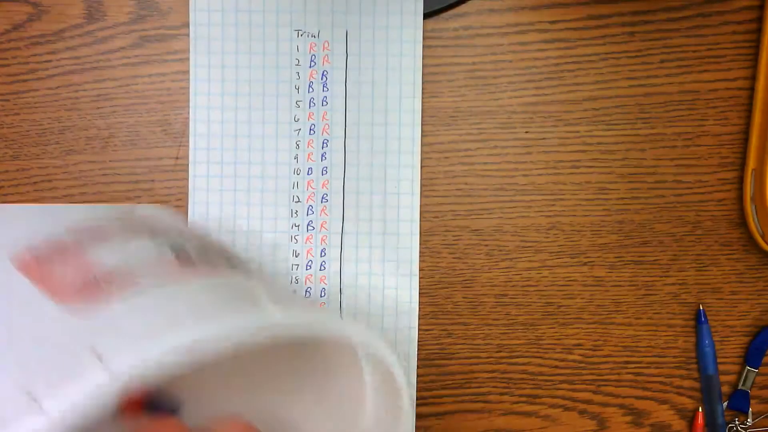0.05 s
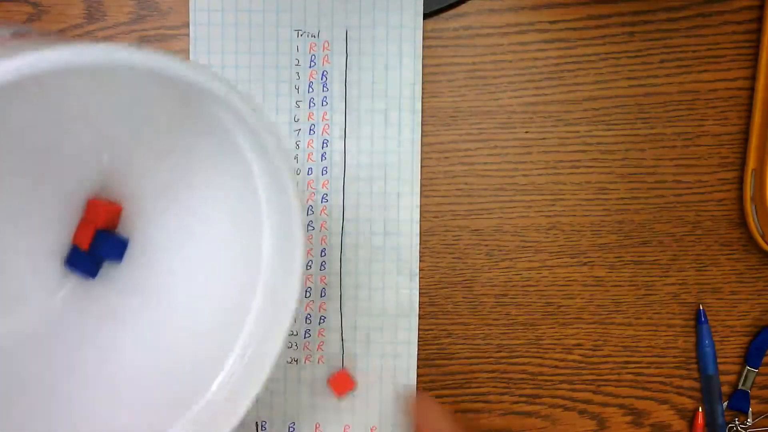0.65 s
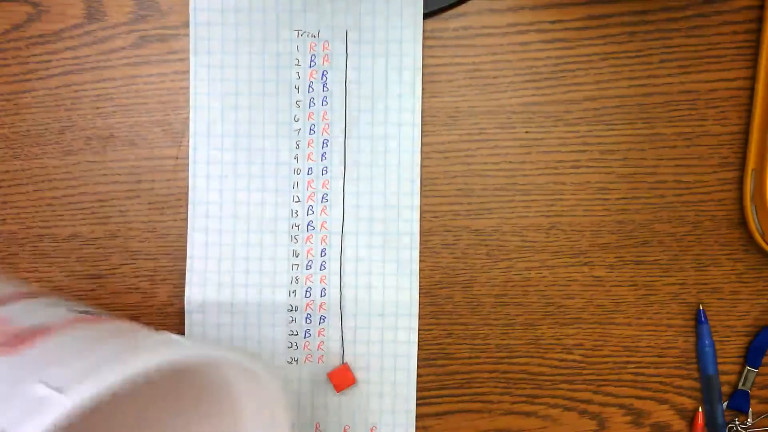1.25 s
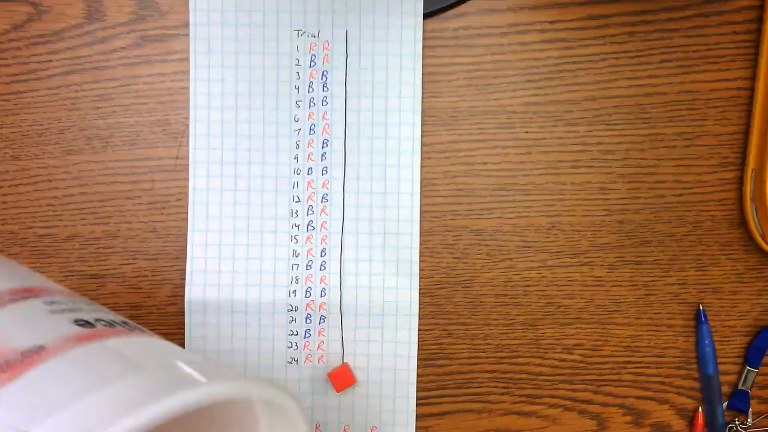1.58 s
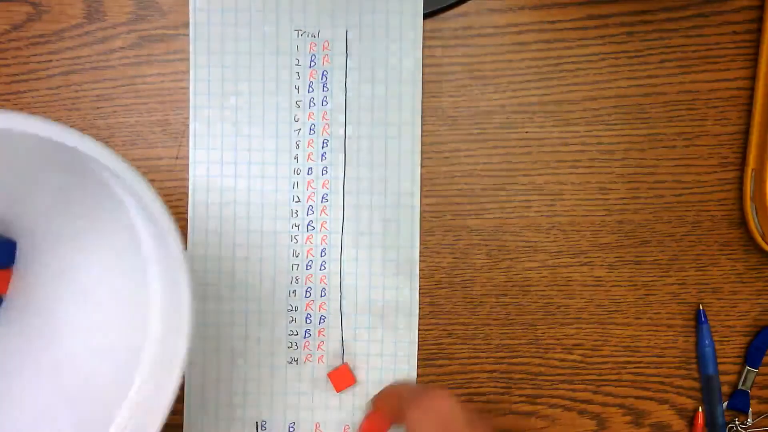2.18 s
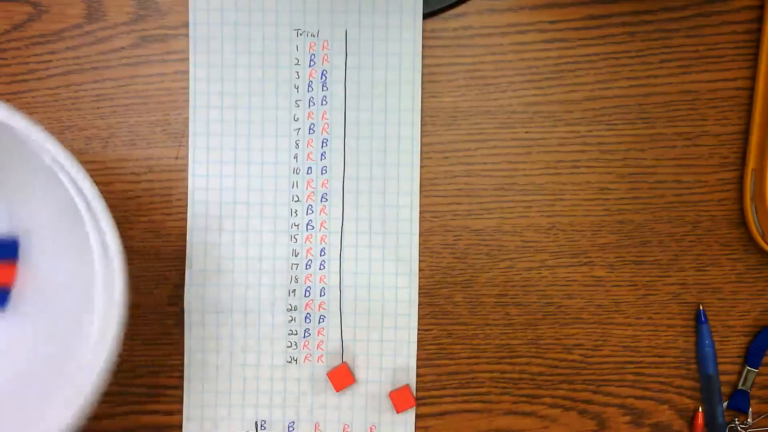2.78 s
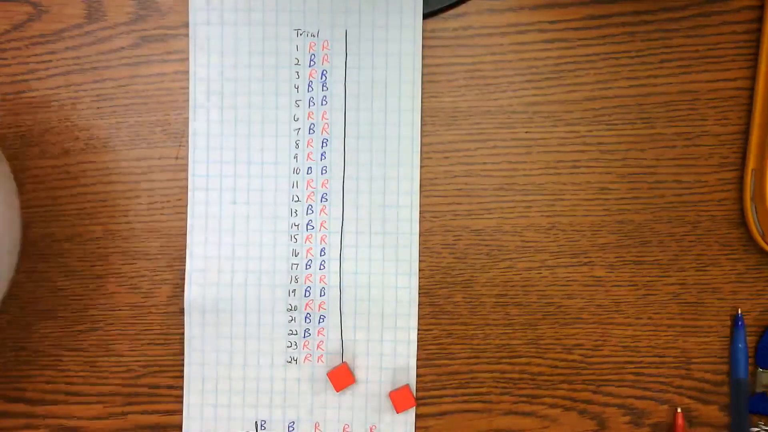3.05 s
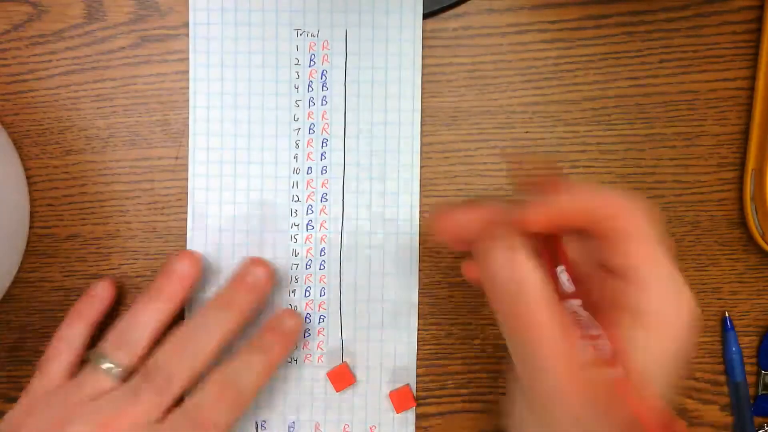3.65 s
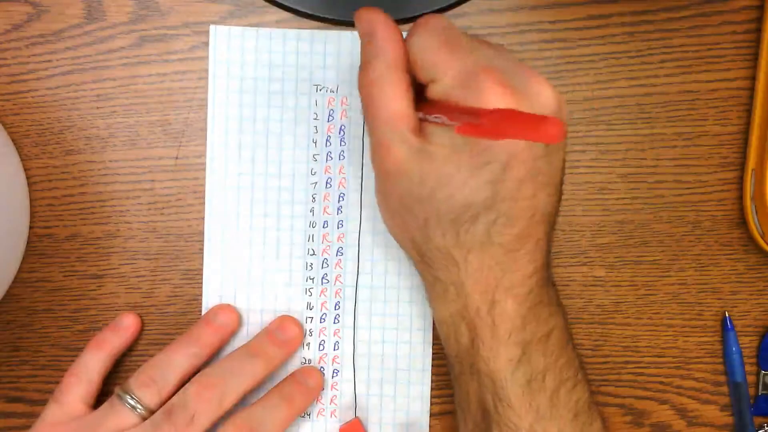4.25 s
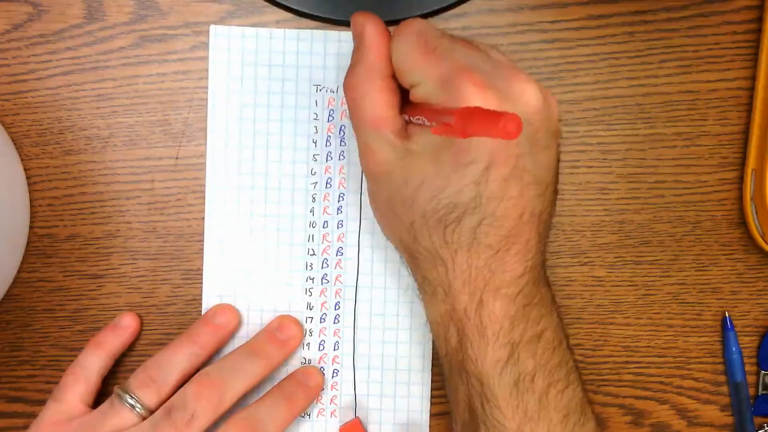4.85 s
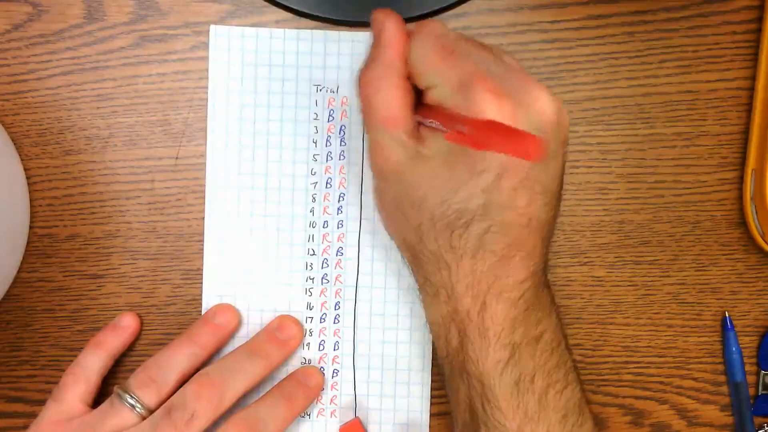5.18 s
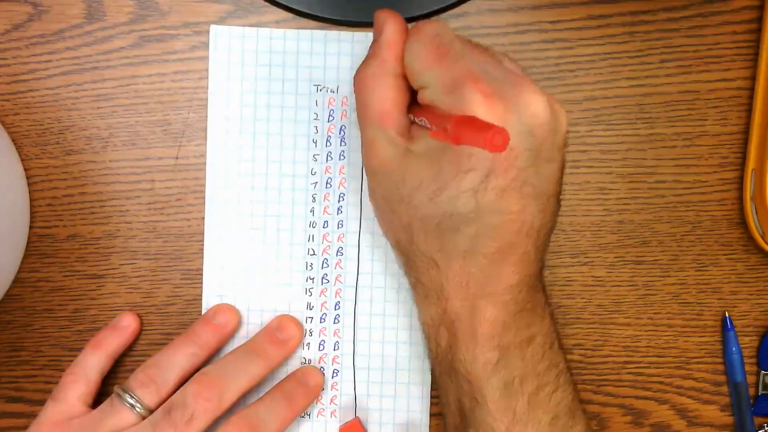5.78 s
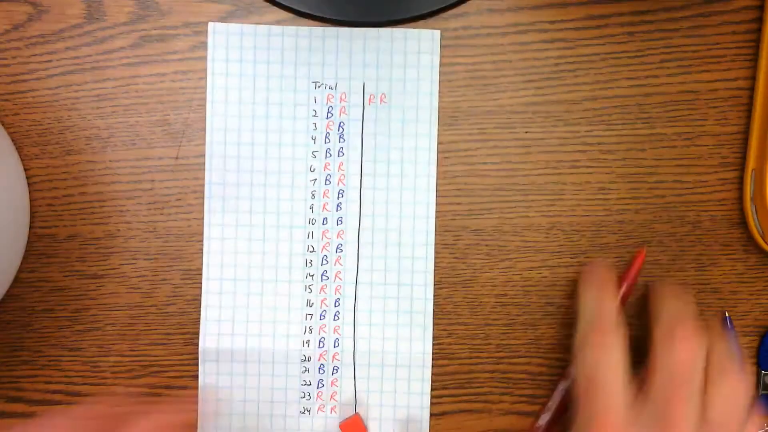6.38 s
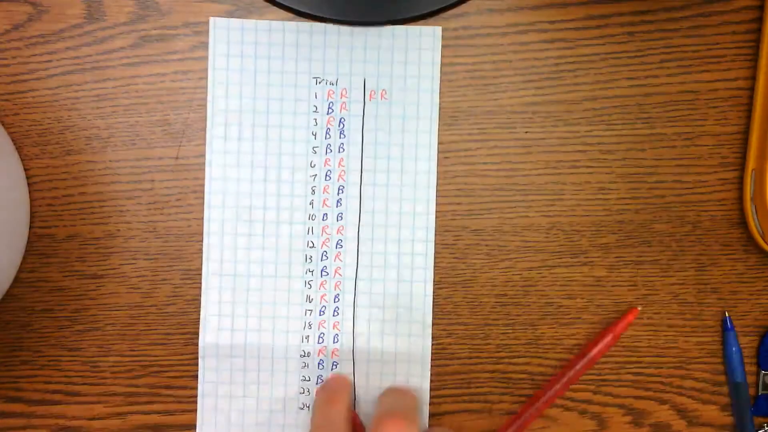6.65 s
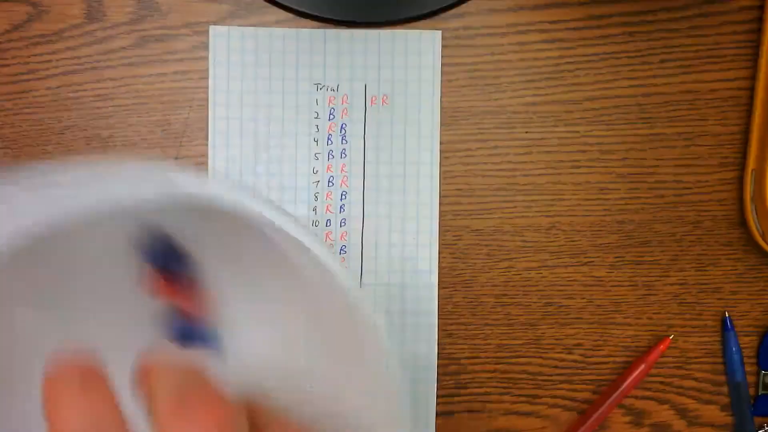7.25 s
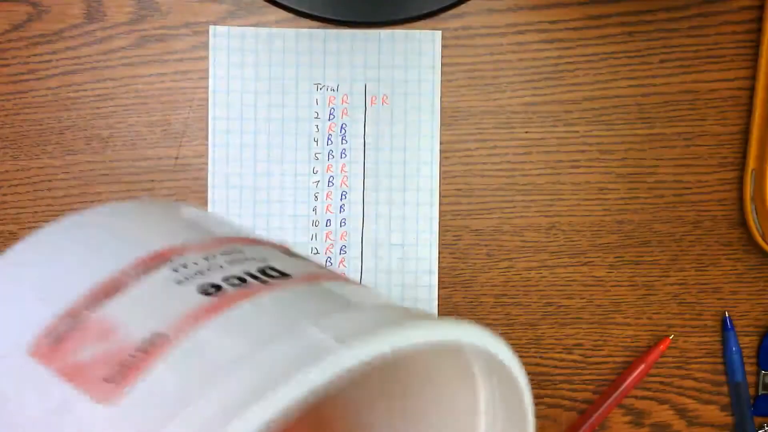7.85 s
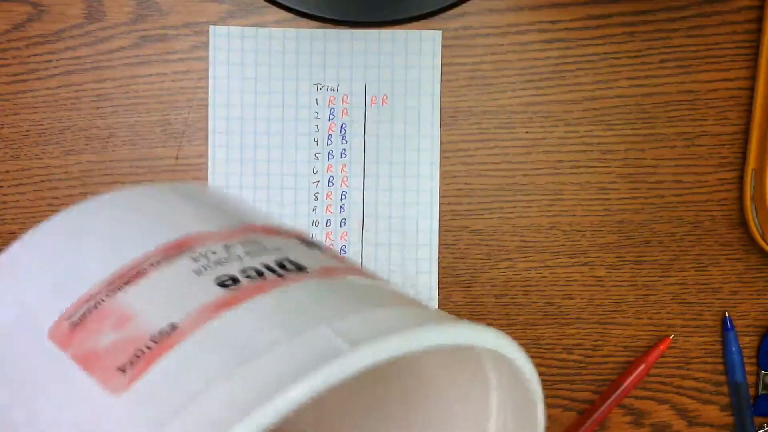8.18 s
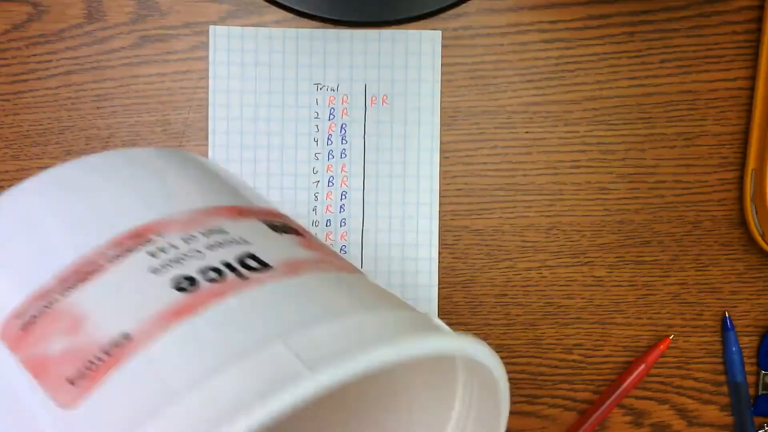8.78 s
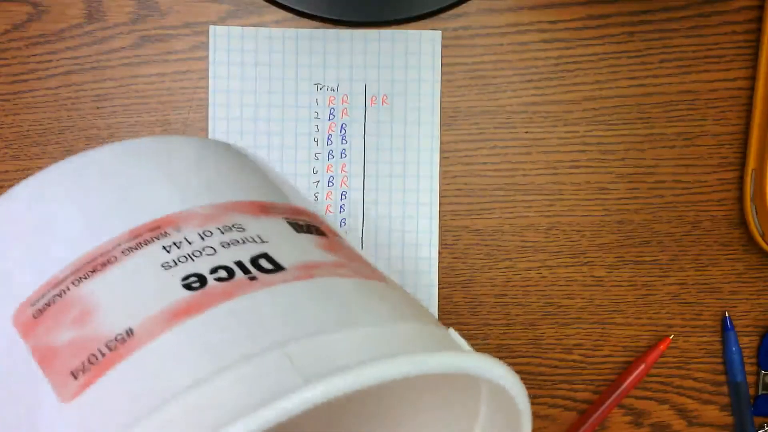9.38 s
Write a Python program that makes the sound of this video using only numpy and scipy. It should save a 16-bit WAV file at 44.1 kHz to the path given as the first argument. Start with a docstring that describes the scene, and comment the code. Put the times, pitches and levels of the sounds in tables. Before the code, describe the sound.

Small plastic cubes rattle, clack and skid inside a thin plastic tub, shaken in uneven bursts for the first two seconds. A cube clicks onto a desk at about 0.5 seconds and another, more lightly, at 2.4. Around 2.9 to 3.3 seconds the tub is set down with hollow knocks as the cubes shift inside. Hands and paper brush softly over the desk until about 4 seconds, with a couple of light taps. It is then nearly silent until more soft brushing at 6 seconds and the sharp click of a pen put down at 6.4. Faint scrapes follow. At 7.3 seconds cubes drop into the tub with the loudest clack, starting busy, continuous rattling that lasts until about 9.5 seconds. Everything is close to the microphone, in a small room with a faint, steady ventilation hum.

```python
"""A quiet, humming room; a small desk microphone stands close to a thin plastic tub of small plastic cubes.
First the cubes are shaken and stirred: each knock rings the tub's base and wall and clacks the cube,
and between knocks they jostle and slide. Then the tub is set down, cubes and a pen are put on the desk,
and hands and paper brush over it. Two cubes drop back into the tub; the hardest hit, at 7.3 s,
opens a last two seconds of rattling."""
import sys
import numpy as np
from scipy import signal
from scipy.fft import rfft, irfft
from scipy.io import wavfile

SR = 44100
rng = np.random.default_rng(int(sys.argv[2]) if len(sys.argv) > 2 else 0)


def generate_wav(sig):
    """Save sig (samples, or channels by samples) to the path in sys.argv[1] as 16-bit PCM at SR."""
    pcm = np.round(np.clip(np.atleast_2d(sig).T, -1, 1) * 32767).astype(np.int16)
    wavfile.write(sys.argv[1], SR, pcm)


N = 419832
TIME = np.arange(N) / SR

# spectrum of the room tone: (frequency [Hz], relative density [dB])
ROOM_TONE = [(15, -46), (25, -2), (86, -12.5), (124, -11.5), (380, -10), (438, -20), (518, -15.5),
             (627, -8.5), (759, -11), (1090, -6.5), (1380, -21), (1480, -11.5), (2220, -17), (5120, -18.5),
             (7500, -33), (9750, -82), (16500, -120)]
# mains hum and fan tones: (frequency [Hz], level [dB])
HUM_TONES = [(120, -77.5), (323, -79.5), (438, -75), (640, -75.5), (1287, -76.5), (1443, -79.5)]
# hands and paper sliding over the desk: (time [s], level [dB])
PAPER_LEVELS = [(3.35, -82), (3.48, -61), (3.6, -70), (3.74, -63), (3.92, -60.5), (4.15, -74), (5.9, -82.5),
                (6.12, -62), (6.26, -62.5), (6.36, -68), (6.62, -61), (6.8, -63), (7.1, -70)]
# cubes and pen touching the desk: (time [s], level [dB], brightest pitch [Hz], its width [octaves])
DESK_TAPS = [(0.5115, -34.5, 4460, 1.2), (2.3697, -47, 5270, 0.8), (2.3747, -42.5, 4640, 2),
             (3.707, -51, 4437, 0.67), (3.785, -42.5, 1950, 8.4), (5.451, -53, 1300, 1.3),
             (6.388, -30, 3220, 5.1), (6.3947, -23, 4500, 2.4), (6.398, -31, 1550, 0.81),
             (6.4492, -38, 1950, 4.2)]
# modes of the whole tub, its base, its wall, and a cube against it: (frequency [Hz], level [dB], t60 [s])
TUB_MODES = [(238, -1.5, 0.1), (295, -12, 0.049), (405, -6.5, 0.067), (586, 11.5, 0.056), (668, 3.5, 0.13),
             (815, 6, 0.013), (893.9, 8, 0.09), (1330, -7, 0.11), (1550, -2.5, 0.038)]
BASE_MODES = [(555.5, -10.5, 0.11), (599, -11.5, 0.037), (652, -2, 0.081), (711, -4, 0.14),
              (964, -3, 0.079)]
WALL_MODES = [(1241, -6, 0.045), (1444, -7.5, 0.053), (1551, 0, 0.028), (1699, -3.5, 0.03),
              (2150, 7.5, 0.022), (2288, 1.5, .04), (2373, -4.5, 0.028), (2510, -4, 0.06)]
CUBE_MODES = [(2940, -2.5, 0.017), (3220, 1.5, 0.017), (3535, -1, 0.013), (3900, -6.5, .016),
              (4447, -9, 0.03), (5376, -6.5, 0.013), (5770, -11, 0.045), (7340, -23.5, 0.0067)]
# blows that move the whole tub: (time [s], level [dB], driven pitch [Hz])
TUB_THUMPS = [(.961, -51.5, 239), (2.9025, -24, 640), (2.902, -36.5, 392), (2.903, -38.5, 257),
              (3.197, -35.5, 635), (3.198, -46.5, 333.6), (3.268, -41.5, 662), (6.816, -52, 660),
              (7.3325, -25.5, 900), (7.3335, -16.5, 1560), (7.335, -40.5, 257), (7.334, -37.5, 415)]
# a cube skidding, or a hand scraping, along the tub: (start [s], end [s], level [dB], driven pitch [Hz],
# scratch gain [dB])
TUB_SCRAPES = [(0.103, 0.133, -34.5, 1550, -22.5), (0.199, 0.441, -45.5, 2220, -21),
               (1.677, 1.807, -49, 3200, -15), (1.81, 2.063, -39.5, 2250, -18),
               (2.103, 2.164, -50.5, 2300, -22), (3.015, 3.203, -47.5, 1960, -19),
               (6.697, 6.86, -59.5, 2900, -6), (6.841, 6.905, -46.5, 2200, -11),
               (6.893, 6.923, -42.5, 1900, -11), (7.026, 7.055, -59, 1900, -14),
               (7.197, 7.272, -52.5, 1800, -8.5), (8.949, 9.036, -43, 2128, -11),
               (9.322, 9.412, -47.5, 2100, -20)]
# wall resonances that a skid excites: (frequency [Hz], width [Hz], gain [dB])
SKID_RESONANCES = [(1580, 64, 7.5), (2263, 65, -1.5), (3370, 83, 1.5), (4040, 230, -10.5), (4930, 370, -3)]
# each shake, stir or drop sets the cubes tumbling: (start [s], length [s], level [dB])
CUBE_TUMBLES = [(0.0, 0.22, -38.5), (0.935, 0.093, -40.5), (1.026, 0.079, -34.5), (1.219, 0.049, -40.5),
                (1.335, 0.077, -37), (1.467, 0.039, -39.5), (1.662, 0.13, -51), (1.79, 0.22, -40.5),
                (2.921, 0.078, -46), (3.192, 0.079, -37.5), (7.269, 0.21, -39), (7.489, .14, -29.5),
                (7.72, .15, -41.5), (7.871, 0.12, -32), (8.1, 0.11, -33), (8.244, 0.095, -45),
                (8.38, 0.013, -37.5), (8.541, 0.056, -40.5), (8.691, .2, -41), (9.04, 0.049, -36),
                (9.151, .18, -39.5), (9.48, 0.0099, -47)]
# loudest hits of a cube on the tub, before each part's trim in knocks():
# (time [s], wall level [dB], clack relative to wall [dB], base relative to wall [dB])
CUBE_KNOCKS = [(0.050, -26.5, -20, -27), (0.104, -27.5, 0, -16.5), (0.154, -28, 4.5, -21),
               (0.205, -28, 1.5, -27), (0.333, -46, 5.5, -21), (1.013, -39, 11, -14.5),
               (1.048, -45, 7, -18), (1.098, -27.5, -5, -33), (1.111, -30, 1.5, -26),
               (1.193, -30.5, -4.5, -24.5), (1.215, -27.5, -2.5, -18), (1.319, -28, -5.5, -19.5),
               (1.435, -24, -3.5, -36), (1.681, -46, -7, -11), (1.799, -35.5, 2.5, -2),
               (1.813, -28, 0, -34), (1.857, -27.5, -16, -31), (1.886, -39, 2, -21), (1.902, -28, -11, -16),
               (1.916, -28, -3.5, -29), (1.953, -30.5, -3, -24), (2.902, -20.5, -2, 0.5),
               (2.919, -32, 6, -17), (2.980, -32, 0.5, -17), (3.011, -34.5, 1.5, -31),
               (3.06, -38, 1, -10.5), (3.198, -26, 4.5, -3.5), (3.24, -35, 9.5, -12),
               (7.266, -31, -0.5, -23.5), (7.3326, -13, 2.5, -18), (7.475, -31, 3, -22),
               (7.511, -28, 4, 1.5), (7.605, -25.5, -4.5, -4.5), (7.628, -22, -13, -29),
               (7.716, -24.5, 1.5, -9.5), (7.753, -22.5, 0.5, -3.5), (7.782, -24.5, -8.5, -27.5),
               (7.828, -29, 1.5, -7), (7.89, -17.5, -2.5, -6.5), (7.904, -20.5, 3, -7.5),
               (7.944, -22, -15, -16.5), (7.956, -24, -0.5, -15), (7.984, -18.5, -4.5, -13.5),
               (8.062, -29, 0, -11), (8.124, -23, -0.5, -33), (8.137, -26.5, 4, -21.5),
               (8.193, -32, 5.5, -28), (8.3515, -26.5, -1, -19.5), (8.402, -28.5, 0.5, -14.5),
               (8.443, -43.5, 5.5, -4), (8.50, -33.5, 1, -17.5), (8.5545, -23.5, -0.5, -17.5),
               (8.715, -25.5, -6.5, -23.5), (8.7585, -25, -13.5, -30), (8.801, -32.5, -2.5, -29),
               (8.8765, -26, -2.5, -24), (9.047, -20, -1.5, -12), (9.07, -26.5, -8.5, -19),
               (9.138, -29, -8.5, -17.5), (9.185, -24, -13, -35), (9.228, -28.5, -5.5, -35),
               (9.246, -29, 0.5, -9.5), (9.279, -27, -2, -26)]


def amp(db):
    """Decibels to gain."""
    return 10 ** (np.asarray(db) / 20)


def band(x, lo_hz, hi_hz, order=2):
    """Band-pass filter."""
    return signal.sosfilt(signal.butter(order, [lo_hz, hi_hz], "band", fs=SR, output="sos"), x)


def unit(hits):
    """Scales each hit to rms 1 over its first five milliseconds."""
    return hits / np.sqrt(np.mean(hits[..., :SR // 200] ** 2, axis=-1, keepdims=True))


def fade(t60_s, size):
    """Exponential decay, 60 dB in t60_s."""
    return np.exp(-np.log(1000) * TIME[:size] / t60_s)


def ringing(modes, size):
    """One damped sine for each mode."""
    t = TIME[:size]
    return np.array([amp(db) * fade(t60, size) * np.sin(2 * np.pi * hz * t) for hz, db, t60 in modes])


def coloured(points, size):
    """Noise of rms 1, its spectrum drawn through (frequency [Hz], level [dB]) points."""
    hz, db = np.transpose(points)
    bins = np.maximum(np.fft.rfftfreq(size, 1 / SR), 1)
    gain = amp(np.interp(np.log(bins), np.log(hz), db))
    noise = irfft(rfft(rng.standard_normal(size)) * gain, size)
    return noise / noise.std()


def place(times, levels_db, hits):
    """Lays hits on the time line."""
    out = np.zeros(N + SR)
    for s, db, hit in zip(times, levels_db, hits):
        start = int(np.clip(s * SR, 0, N))
        out[start:start + len(hit)] += amp(db) * hit
    return out[:N]


def room_tone(air_db=-62.5, waver=0.88):
    """The bed under everything: ventilation noise with slightly wavering mains hum and fan tones."""
    out = amp(air_db) * coloured(ROOM_TONE, N)
    knots = np.linspace(0, N / SR, 120)
    mains_hz = HUM_TONES[0][0]
    for hz, db in HUM_TONES:
        drift = np.interp(TIME, knots, np.cumsum(rng.standard_normal(len(knots))))
        phase = 2 * np.pi * hz * TIME + waver * hz / mains_hz * drift
        out += np.sqrt(2) * amp(db) * np.sin(phase)
    return out


def room_reverb(direct, t60_s=0.52, wet_db=-14, build_s=0.00093, size=26000):
    """A small furnished room: at this close distance its short, dense tail lies under the direct sound."""
    tail = coloured([(100, -6.0), (300, 15.5), (1500, 0.0), (7000, 1.5)], size) * fade(t60_s, size)
    tail *= np.clip(TIME[:size] / build_s - .5, 0, 1)
    return direct + amp(wet_db) * signal.fftconvolve(direct, tail / np.linalg.norm(tail))[:N]


def paper_slides(grain_db=1.0):
    """Skin and paper rub over the desk with a soft, grainy hiss."""
    grain = np.interp(TIME, np.linspace(0, N / SR, 900), rng.standard_normal(900))
    hiss = coloured([(300, -17), (1200, -10), (3000, -9), (5000, -3), (7000, -15.5), (9000, -26.5)], N)
    level_db = np.interp(TIME, *np.transpose(PAPER_LEVELS))
    return hiss * amp(level_db + grain_db * grain)


def desk_taps(t60_s=0.015, chatter_db=-23, chatter_t60_s=0.1, wood_db=-19, wood_t60_s=0.013, size=4000):
    """A cube or pen clicks on the wooden desk, knocks it dully and chatters faintly as it settles."""
    s, db, _, _ = np.transpose(DESK_TAPS)
    grid_hz = np.geomspace(100, 8000, 30)
    envelope = fade(t60_s, size) + amp(chatter_db) * fade(chatter_t60_s, size)
    hits = []
    for _, _, hz, octaves in DESK_TAPS:
        emphasis_db = -20 * np.log10(1 + (2 * np.log2(grid_hz / hz) / octaves) ** 2)
        noise = coloured(np.column_stack([grid_hz, emphasis_db]), size)
        click = unit(band(noise * envelope, 860, 4660))
        wood = unit(band(rng.standard_normal(size) * fade(wood_t60_s, size), 210, 1000))
        hits.append(click + amp(wood_db) * wood)
    return place(s, db, hits)


def tub_thumps(reach_octaves=0.3, thud_db=-5, thud_t60_s=0.029, size=12000):
    """The tub is gripped, set down or hit hard: a dull thud, and modes near the driven pitch ring on."""
    s, db, driven_hz = np.transpose(TUB_THUMPS)
    octaves = np.log2(np.array(TUB_MODES)[:, 0] / driven_hz[:, None])
    weights = np.exp(-(octaves / reach_octaves) ** 2) * (-1) ** np.arange(len(TUB_MODES))
    rings = unit(weights @ ringing(TUB_MODES, size))
    envelope = fade(thud_t60_s, size)
    thuds = np.array([band(rng.standard_normal(size) * envelope, hz / 1.154, hz * 1.47)
                      for hz in driven_hz])
    return place(s, db, unit(rings + amp(thud_db) * unit(thuds)))


def skids(slips_per_second=1300, scatter_db=5.0, reach_octaves=0.17):
    """A cube or a gripping hand sticks and slips along the tub: a run of tiny uneven jerks keeps a few wall
    resonances ringing."""
    runs = []
    for start, end, _, driven_hz, scratch_db in TUB_SCRAPES:
        t = TIME[:int((end - start + .02) * SR)]
        slips = (rng.random(len(t)) < slips_per_second / SR) * (t < end - start)
        jerks = slips * amp(scatter_db * rng.standard_normal(len(t)))
        run = amp(scratch_db) * band(jerks, 1400, 3700)
        for hz, width, db in SKID_RESONANCES:
            weight = amp(db) / (1 + (np.log2(hz / driven_hz) / reach_octaves) ** 2)
            run += weight * signal.lfilter(*signal.iirpeak(hz, hz / width, fs=SR), jerks)
        run = band(run, 1300, 5100)
        runs.append(run / run.std())
    start, _, db, _, _ = np.transpose(TUB_SCRAPES)
    return place(start, db, runs)


def struck(count, modes, lo_hz, hi_hz, crack_db, crack_t60_s, detune=0.023, spread_s=0.0007, size=2600):
    """Plastic hit on a new spot each time: a new mix of modes, plus a crack of many short-lived ones."""
    t = TIME[:size]
    rings = rng.standard_normal((count, len(modes))) @ ringing(modes, size)
    # the grip and the resting cubes load the thin plastic, so its pitch shifts from hit to hit
    pitch_ratios = 1 + detune * rng.standard_normal(count)
    rings = np.array([np.interp(t * ratio, t, ring) for ratio, ring in zip(pitch_ratios, rings)])
    cracks = rng.standard_normal((count, size)) * fade(crack_t60_s, size)
    # bending waves need a moment to spread round the wall
    rise = 1 - np.exp(-t / spread_s)
    rings = unit(band(rings * rise, lo_hz, hi_hz))
    cracks = unit(band(cracks * rise, lo_hz, hi_hz, order=3))
    return unit(rings + amp(crack_db) * cracks)


def tumbling(at, start_db_per_s=595, settle_db_per_s=214.5):
    """Level of the cubes' motion in dB: each tumble gets going quickly, holds and settles more slowly."""
    start, length, db = np.transpose(CUBE_TUMBLES)[:, :, None]
    before_s = np.maximum(start - at, 0)
    after_s = np.maximum(at - start - length, 0)
    return np.max(db - start_db_per_s * before_s - settle_db_per_s * after_s, axis=0)


def jostle(per_second=210, scatter_db=5.0, clack_scatter_db=3.0, still_db=-68):
    """Dense light contacts of uneven strength as the cubes tumble over the plastic."""
    slots = np.arange(N / SR * per_second)
    late, strength, corner = rng.standard_normal((len(slots), 3)).T
    s = (slots + .35 * late) / per_second
    motion_db = tumbling(s)
    moving = motion_db > still_db
    # some contacts barely graze, and none outdoes the motion of the tub by much
    db = (motion_db + scatter_db * np.minimum(strength, 1.2))[moving]
    s, clack_db = s[moving], clack_scatter_db * corner[moving]
    # contacts harder than a middling -30.5 dB reach the base more
    base_db = -23.5 + 0.04 * (db + 30.5)
    wall = struck(len(s), WALL_MODES, 1124, 2200, crack_db=-13, crack_t60_s=0.032, size=1700)
    cube = struck(len(s), CUBE_MODES, 2110, 5080, crack_db=0.5, crack_t60_s=0.025, size=1700)
    base = struck(len(s), BASE_MODES, 514, 996, crack_db=1.0, crack_t60_s=0.026, size=1700)
    return place(s, db - 4, wall) + place(s, db + clack_db - 2, cube) + place(s, db + base_db, base)


def rebound(hits, shortest_s, longest_s, db):
    """A cube lands on a corner and falls flat a moment later: each hit gets a second, weaker contact."""
    t = TIME[:hits.shape[1]]
    lags = shortest_s + (longest_s - shortest_s) * rng.random(len(hits))
    delayed = np.array([np.interp(t - lag, t, hit, left=0) for lag, hit in zip(lags, hits)])
    return hits + amp(db) * delayed


def knocks(graze_s=.0025, graze_db=-13, follow_s=0.008, follow_db=-11, clatter_db_per_db=1.4):
    """The foreground, close to the microphone: a hit rings wall and hollow base and clacks the cube."""
    s, db, clack_db, base_db = np.transpose(CUBE_KNOCKS)
    early, late = .5 + rng.random((len(s), 2)).T
    # a flat face lands clean; a corner grazes first and clatters after
    clatter_db = db + clatter_db_per_db * np.minimum(clack_db, 0)
    s = np.r_[s - graze_s * early, s, s + follow_s * late]
    db = np.r_[clatter_db + graze_db, db, clatter_db + follow_db]
    clack_db, base_db = np.tile(clack_db, 3), np.tile(base_db, 3)
    wall = struck(len(s), WALL_MODES, 1256, 3500, crack_db=-6.5, crack_t60_s=0.045, spread_s=0.00024)
    cube = struck(len(s), CUBE_MODES, 2400, 5450, crack_db=-2.5, crack_t60_s=0.041, spread_s=0.00032)
    base = struck(len(s), BASE_MODES, 556, 980, crack_db=-2, crack_t60_s=0.049)
    wall = unit(rebound(wall, shortest_s=0.001566, longest_s=0.003903, db=-13.0))
    cube = unit(rebound(cube, shortest_s=0.00154, longest_s=0.0055, db=-14))
    return (place(s, db + 0.14, wall)
            + place(s, db + clack_db + .3, cube)
            + place(s, db + base_db - 6.0, base))


def scene():
    """What reaches the microphone, in mono: tub and desk with their reverb, paper and room tone."""
    contacts = knocks() + jostle() + skids() + tub_thumps() + desk_taps()
    return (room_reverb(contacts) + paper_slides() + room_tone())[None]


def record(dry, mic_top_hz=7118, full_scale=.78, low_cut_hz=90, top_hz=16000):
    """A narrow-band desk microphone whose amplifier overloads on the hardest hit and thins the bass."""
    heard = signal.sosfilt(signal.cheby1(11, .5, mic_top_hz, fs=SR, output="sos"), dry)
    clipped = heard / (1 + (heard / full_scale) ** 8) ** (1 / 8)
    thinned = signal.sosfilt(signal.butter(1, low_cut_hz, "high", fs=SR, output="sos"), clipped)
    return signal.sosfilt(signal.ellip(8, .2, 70, top_hz, fs=SR, output="sos"), thinned)


dry = scene()
out = record(dry)
generate_wav(out)
```